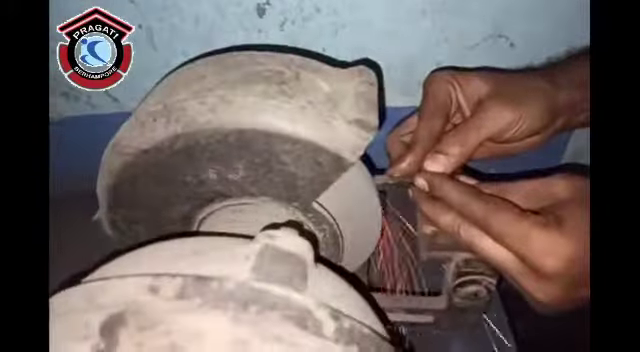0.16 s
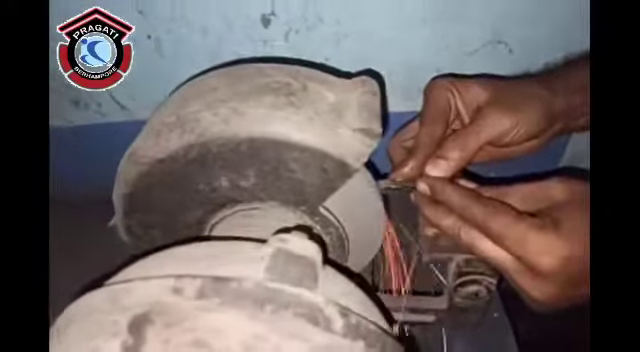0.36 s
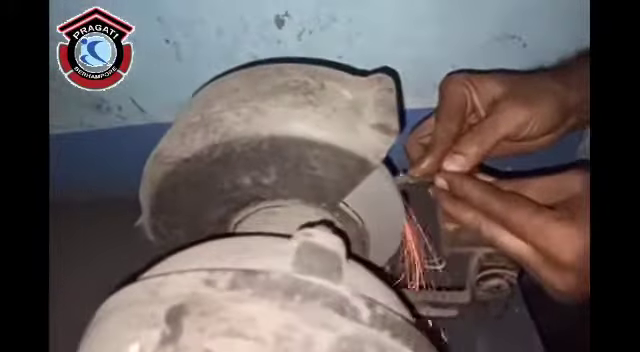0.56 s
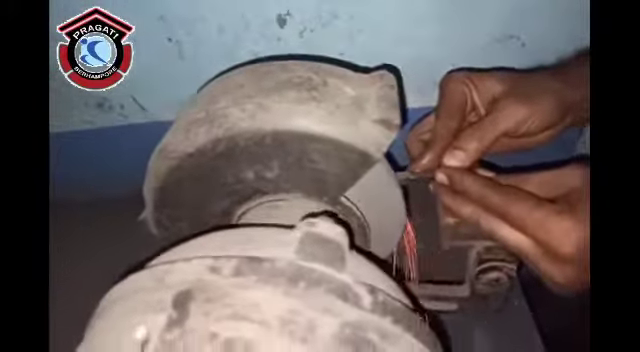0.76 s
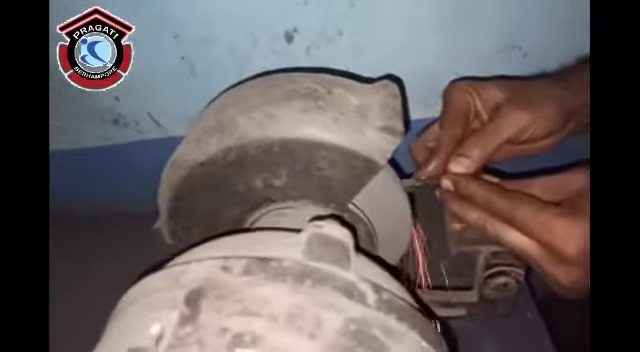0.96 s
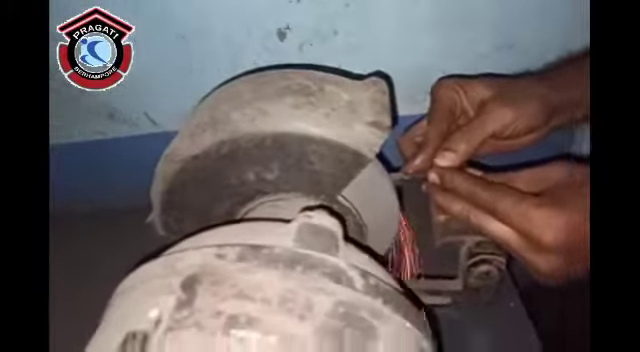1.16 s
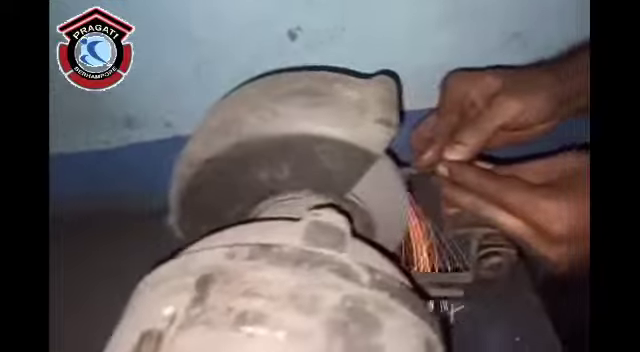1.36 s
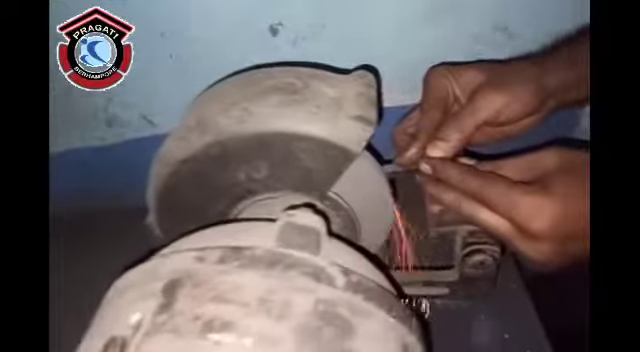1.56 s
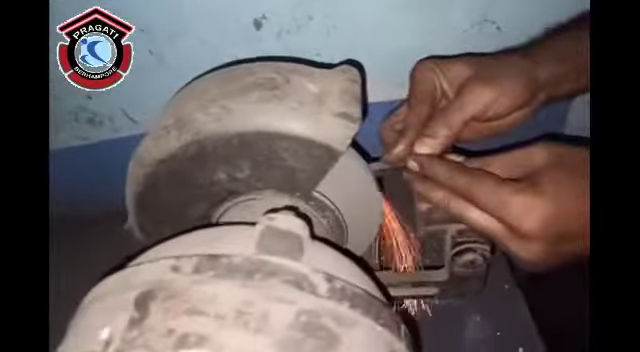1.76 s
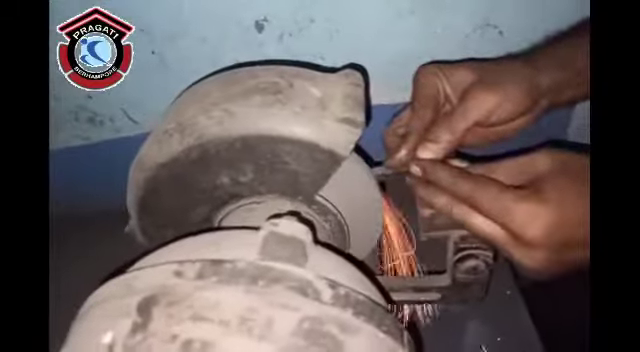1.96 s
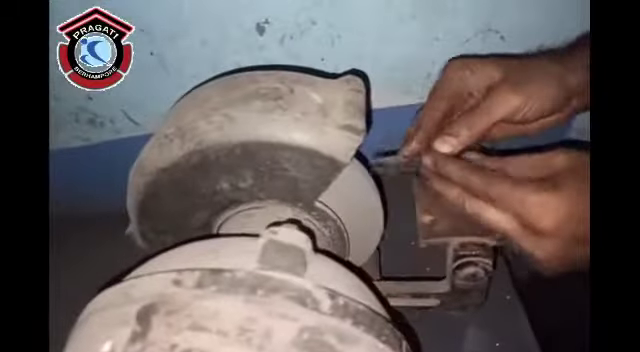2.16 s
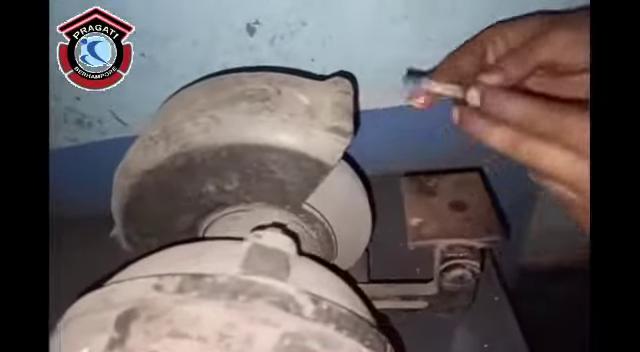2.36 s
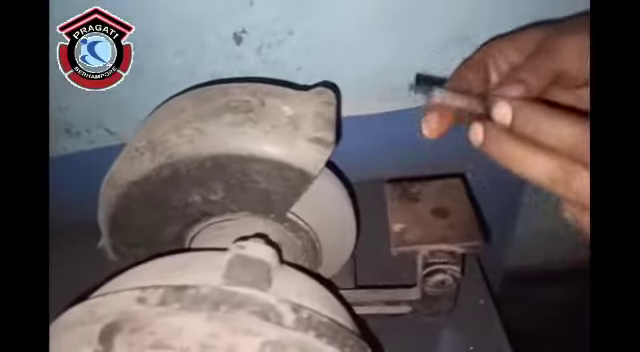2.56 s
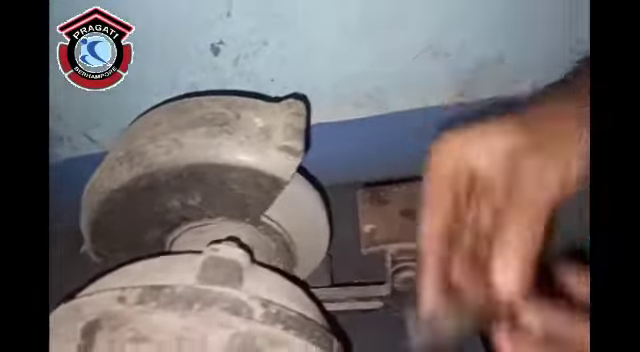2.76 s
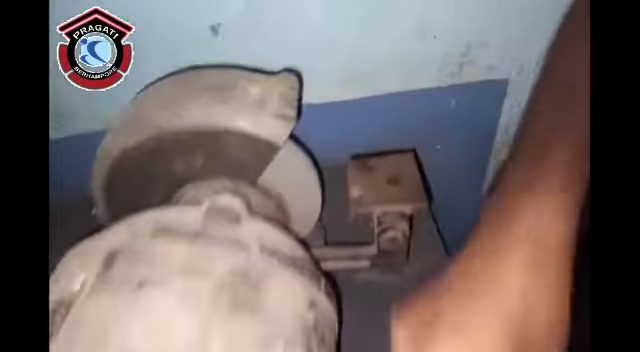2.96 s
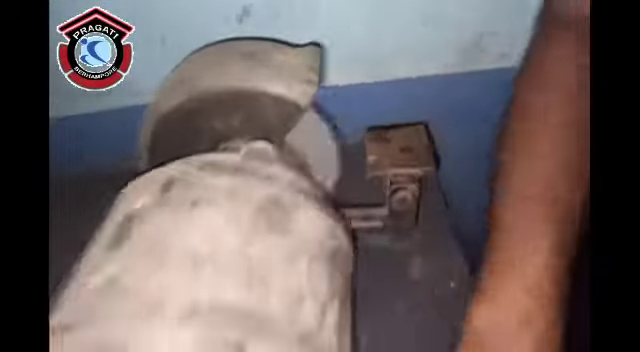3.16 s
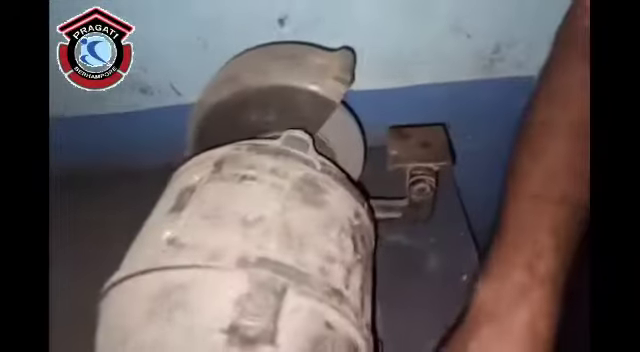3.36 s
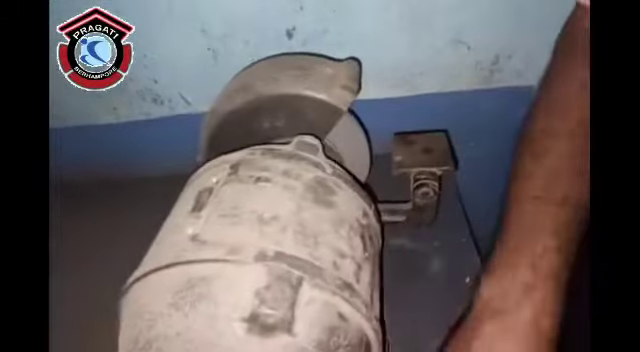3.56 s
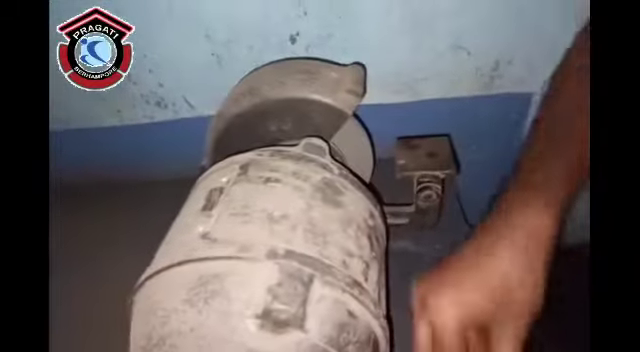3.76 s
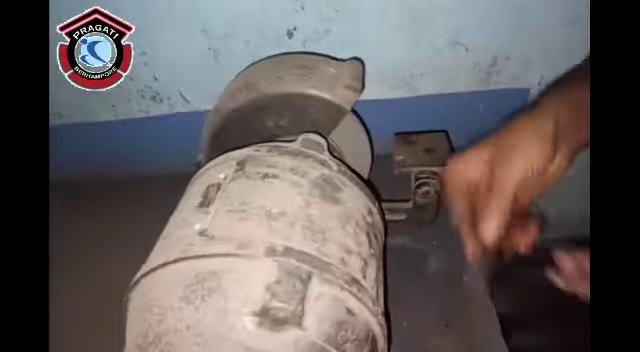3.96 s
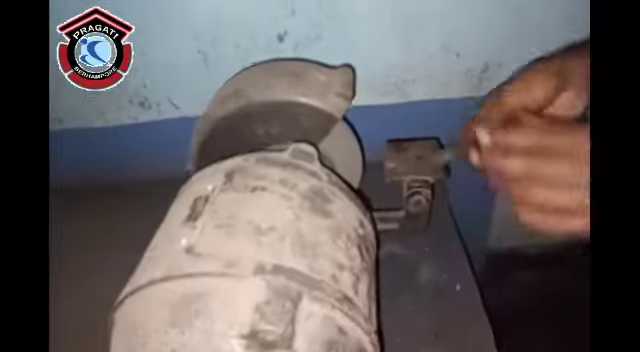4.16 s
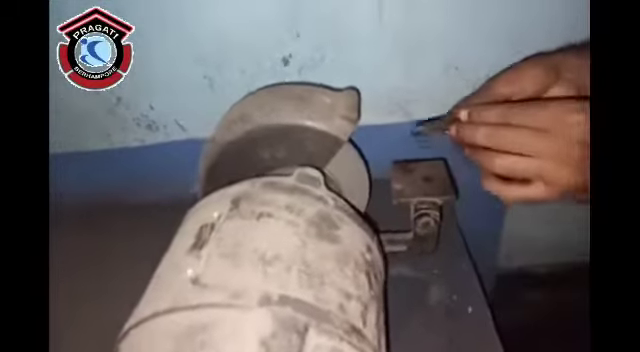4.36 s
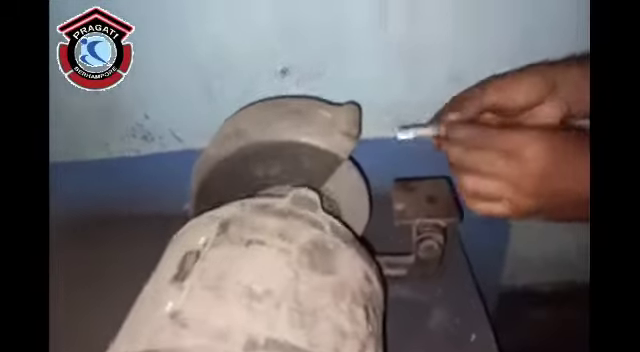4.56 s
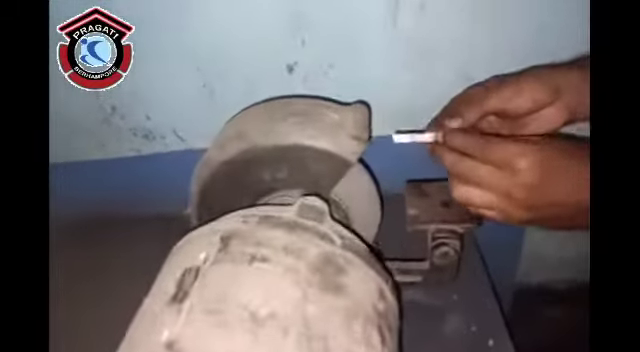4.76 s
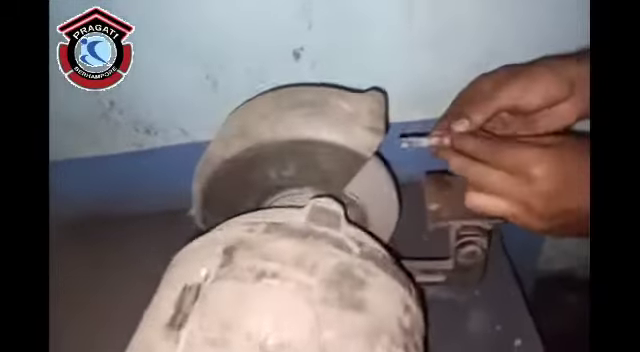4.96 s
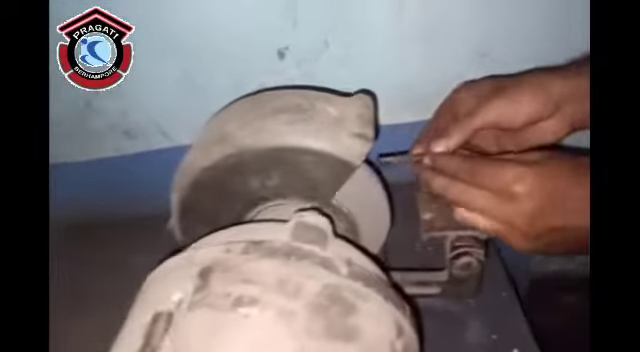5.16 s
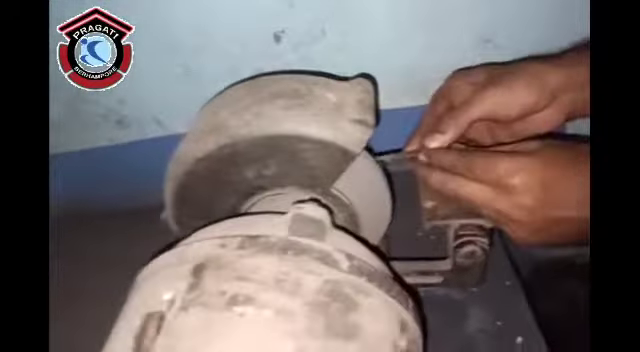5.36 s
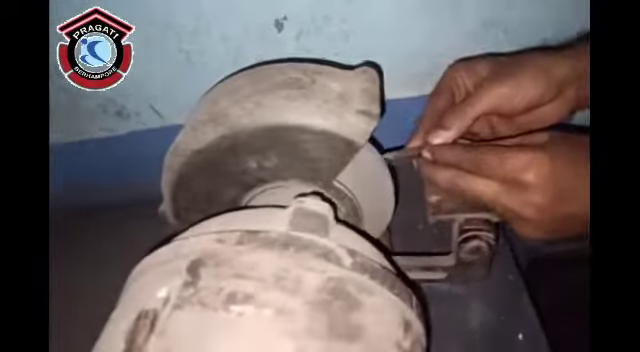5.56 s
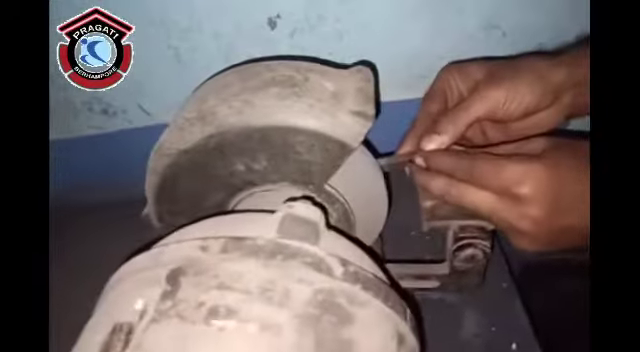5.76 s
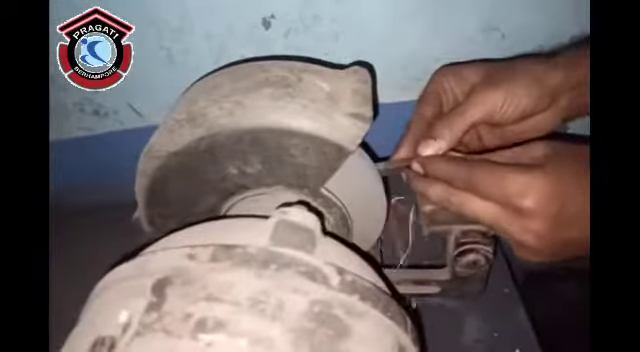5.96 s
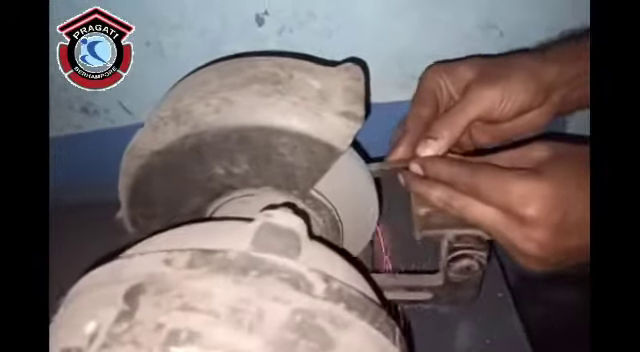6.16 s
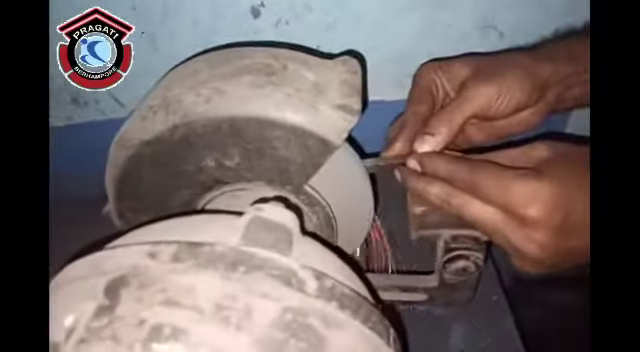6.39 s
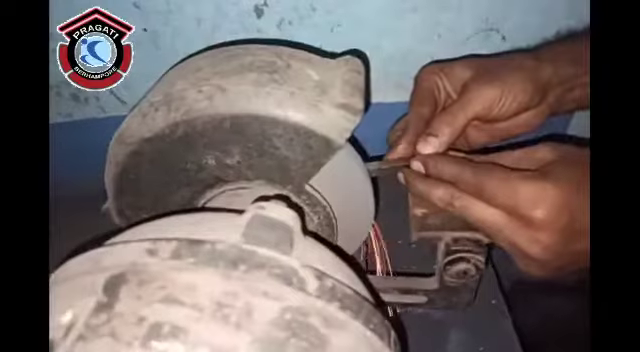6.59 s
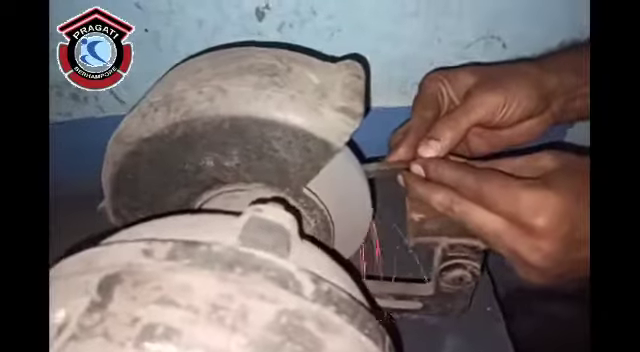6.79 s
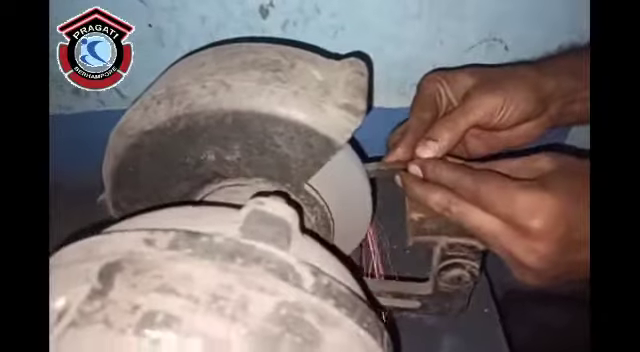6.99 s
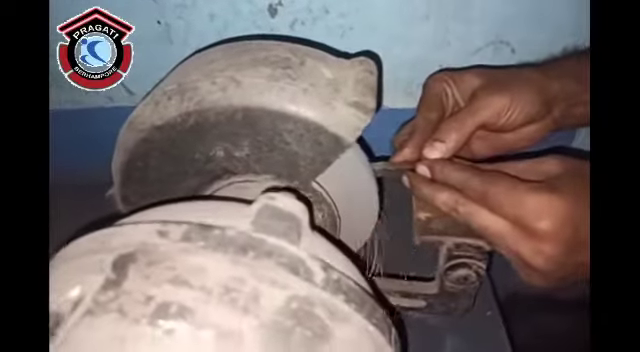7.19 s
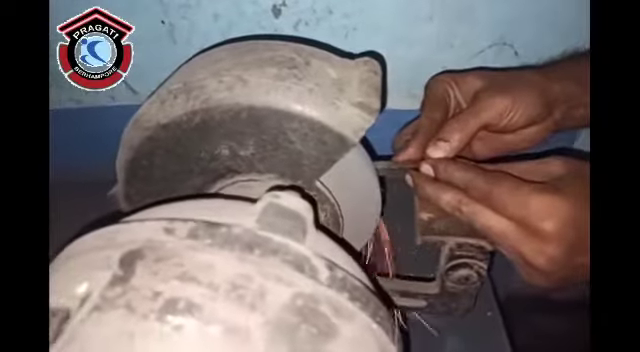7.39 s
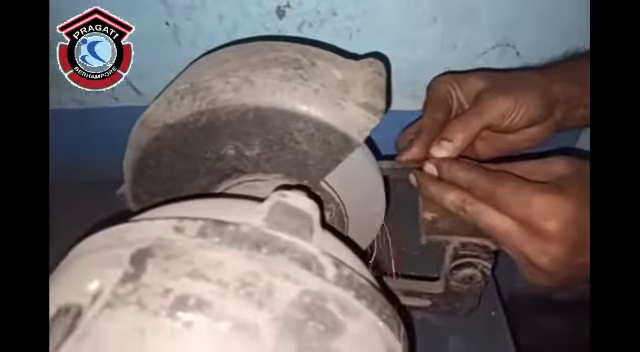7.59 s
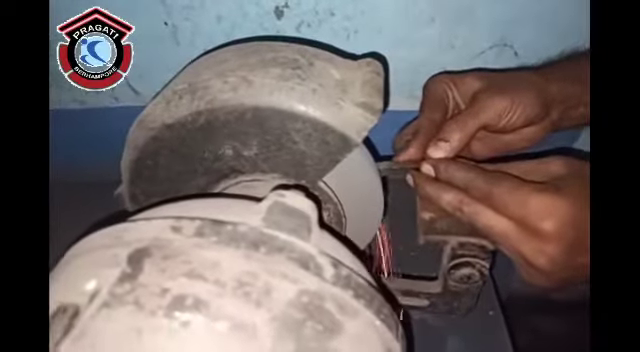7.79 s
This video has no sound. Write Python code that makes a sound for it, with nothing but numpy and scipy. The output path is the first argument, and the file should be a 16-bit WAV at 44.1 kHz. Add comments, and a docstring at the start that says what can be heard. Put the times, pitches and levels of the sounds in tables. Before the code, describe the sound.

A bench grinder runs close to the microphone in a small workshop, its motor humming low. At first a short steel bar rasps on the wheel, bright and ringing, with little squeals. The grinding stops, and for nearly four seconds the spinning machine rumbles and rattles with irregular metallic clanks. Then the rattle dies down as the steel meets the wheel again, hissing and squealing to the end.

```python
"""A bench grinder grinds a short steel bar, twice, in a small workshop. Grit makes the bar hiss,
ring and squeal; the wheel's uneven rim drones through the frame, repeating once a turn.
Between the two spells the wheel runs free and loose bearings rattle in the housing and wheel guard;
the load quiets them. The motor hums at multiples of the mains rate throughout."""
import sys
import numpy as np
from scipy import signal
from scipy.fft import rfft, irfft
from scipy.io import wavfile
from scipy.ndimage import uniform_filter1d

SR = 44100
rng = np.random.default_rng(int(sys.argv[2]) if len(sys.argv) > 2 else 0)


def to_wav(s):
    """Save 16-bit WAV."""
    ch = np.atleast_2d(s).T  # columns
    pcm = np.round(np.clip(ch, -1, 1) * 32767)  # PCM
    wavfile.write(sys.argv[1], SR, pcm.astype(np.int16))


N = 345303
TIME_S = np.arange(N) / SR
FREQ_HZ = np.maximum(np.arange(N // 2 + 1) * SR / N, 1)

# bar on the wheel: start_s, end_s
CONTACT_SPANS = [(-.3, 2.135), (5.908, 9)]
# housing and guard resonances: freq_hz, width_hz, boost_db
HOUSING_MODES = [(290.5, 22, -6.5), (318, 35, 2.5), (387.4, 24.8, 13.5), (468.3, 48, 9.5), (518, 17, -4),
                 (563.6, 25.4, 9.5), (627, 35, 4.5), (684.6, 48, 12), (737, 30, -5), (942.4, 73, 15.5),
                 (1015, 48, 11), (1083, 78, 10.5), (1193, 50, 11.5), (1296, 43, -0.5), (1739, 110, 10.5),
                 (1882, 120, 8), (2154, 146, 7), (2350, 70, 3), (2465, 100, 3.5), (2582, 30, 12.5),
                 (2660, 98, -1.5), (3216, 120, 6.5), (3550, 1130, 6.5), (4390, 130, 7.5), (4680, 120, 11),
                 (4850, 50, 9), (5670, 120, 6), (6550, 120, 1), (7590, 230, 7)]
# broad spectrum of bearing knocks: freq_hz, gain_db
KNOCK_COLOUR = [(25, -39), (50, -27), (100, -26.5), (200, -11), (300, -5), (450, 1.5), (800, -9.5),
                (1100, -11.5), (1500, -13), (2800, -20), (4000, -20), (5000, -31), (6800, -17),
                (8400, -28.5), (12000, -31.5)]
# likeness of the two ears, under load and running free: freq_hz, correlation
LOAD_CORRELATION = [(60, -0.26), (92, 0.69), (140, -0.064), (210, 0.12), (330, 0.46), (500, 0.47),
                    (770, 0.29), (1170, 0.57), (1790, 0.22), (2740, -0.065), (4190, 0.25), (6410, -0.017),
                    (9810, 0.18), (15000, -0.61)]
FREE_CORRELATION = [(60, 0.65), (99, 0.91), (160, 0.74), (270, 1), (450, 0.51), (740, 0.75), (1220, 0.56),
                    (2010, -0.017), (3330, -0.39), (5500, 0.032), (9080, 0.024), (15000, 0.076)]
# left over right, under load and running free: freq_hz, pan_db
LOAD_PAN = [(60, 3), (99, 16), (160, 7), (270, 3.5), (450, -3), (740, -6.5), (1220, -3), (2010, -2),
            (3330, -2.5), (5500, -2), (7400, -3), (8350, 6), (15000, 2.5)]
FREE_PAN = [(60, -4), (92, 10.5), (140, 4.5), (210, -2.5), (330, 0), (500, 3), (770, -1), (1170, 1.5),
            (1790, 4), (2740, 0), (4190, -4), (6410, -0.5), (9810, -0.5), (15000, 3)]
LOAD_STEREO, FREE_STEREO = (LOAD_CORRELATION, LOAD_PAN), (FREE_CORRELATION, FREE_PAN)


def grit(turns, age_s, hiss_swing, sing_swing, pitch_hz, sing_hz=4060, sing_width_hz=320):
    """Grains cut the steel and ring the bar, hardest where the wheel's high spot passes."""
    # broad spectrum of the cuts: freq_hz, gain_db
    cut_colour = [(1200, -19.5), (2800, -17.5), (3500, -7), (4500, -9), (5000, -19.5), (6500, -8),
                  (8400, 0.5), (8620, 9.5), (9000, 7.5), (12000, -6), (15500, -8)]
    # bar resonances: freq_hz, width_hz, boost_db
    bar_modes = [(3950, 50, 7), (4058, 220, 20), (4240, 110, 4), (4390, 90, 4), (4670, 110, 5),
                 (5290, 110, 5), (5820, 120, 10), (6170, 93, 5.5), (6290, 130, 5), (6830, 200, 3),
                 (7290, 130, 5), (7470, 100, 3), (7615, 75, 5), (7730, 80, -3), (7860, 110, 1),
                 (7990, 100, 1.5), (8215, 90, 6), (8330, 150, 5.5), (8465, 90, 10), (8590, 100, -7)]
    # depth of bite: time_s, gain_db
    hiss_curve = [(0, -20.5), (.7, -17.5), (2.1, -18.5), (5.95, -18), (7.83, -19)]
    # rasp, growing with hand pressure: time_s, gain_db
    rasp_curve = [(0, -3), (.4, -5), (.7, -.5), (1.3, 0.5), (1.65, -1.5), (2.1, -2), (5.92, -3), (6.2, 0),
                  (7.2, 0.5), (7.83, 0)]
    # how freely the fingers let the lowest mode sing: time_s, gain_db
    sing_curve = [(0, -26), (.2, -23), (.85, -29), (1.6, -22.5), (2.1, -24), (5.92, -33), (6.03, -22.5),
                  (6.25, -25.5), (7.83, -24.5)]
    rasp_band_hz, chatter_band_hz = (5500, 7900), (8460, 8750)
    bite_s, settle_s = 0.093, 0.14
    force = once_a_turn(turns, hiss_swing) * flutter(1.15, rate_hz=100)
    cuts = impacts(per_s=36000, spread_db=2.5, force=force)
    bar = body(cut_colour, bar_modes)
    lowest_mode = np.exp2(-(2 * (FREQ_HZ - sing_hz) / sing_width_hz) ** 4)
    hiss = wall_reflection(radiate(cuts, bar * (1 - lowest_mode), *LOAD_STEREO))
    # the bar bounces in the fingers: its two loudest modes sound in uneven spurts
    spurts = once_a_turn(turns, sing_swing) * flutter(2, rate_hz=50)
    spurts /= rms(spurts)
    high_mode = band(hiss, *chatter_band_hz)
    chatter = band(saturate(high_mode), *chatter_band_hz) * rms(high_mode.mean(axis=0)) * spurts
    rasp_change = (from_db(over_time(rasp_curve)) - 1) * band(hiss, *rasp_band_hz)
    hiss = hiss - high_mode + chatter + rasp_change
    hiss_db = over_time(hiss_curve) + 5 - 2 * np.exp(-age_s / bite_s)
    sing = saturate(radiate(cuts, bar * lowest_mode, *LOAD_STEREO))
    sing = irfft(rfft(sing * spurts) * lowest_mode, N)
    # the pitch lands sharp, settles and wavers with the grip
    bend_hz = pitch_hz - sing_hz + 70.56 * np.exp(-age_s / settle_s) + 8 * drift(12)
    sing = np.real(signal.hilbert(sing) * np.exp(2j * np.pi * np.cumsum(bend_hz) / SR))
    return from_db(hiss_db) * hiss + from_db(over_time(sing_curve) - 0.25) * sing


def frame(gain_db):
    """The cutting force shakes the wheel, and with it the housing."""
    # broad spectrum of the shaking: freq_hz, gain_db
    shake_colour = [(25, -29), (40, -35), (75, -8), (110, -3.5), (200, 0), (300, -1), (450, 4), (700, -2.5),
                    (850, -5.5), (1100, -3), (1400, 0.5), (1700, -6.5), (2200, -8.5), (2900, -8.5)]
    shakes = impacts(per_s=8000, spread_db=1, force=flutter(1.5, rate_hz=60))
    housing = body(shake_colour, HOUSING_MODES) * lowpass(3000, order=7)
    return from_db(gain_db - 1.5) * radiate(shakes, housing, *LOAD_STEREO)


def rim_drone(turns, level_db, waver_db=2.5):
    """The same bumps of the rim come round every turn and drone at multiples of the turning rate."""
    # rim harmonics: multiple, relative_db
    harmonics = [(6, -17), (7, -21), (8, -12), (9, -9), (11, -15), (13, -7), (14, -7.5), (15, -20.5),
                 (16, -16), (19, -18), (20, -16), (21, -4.5), (22, -1), (26, -17), (28, -10.5), (29, -12.5),
                 (40, -16.5), (47, -23), (48, -20), (53, -29)]
    drone = sum(from_db(db + waver_db * drift(5)) * np.sin(2 * np.pi * (k * turns + rng.random()))
                for k, db in harmonics)
    return pan(-4) * from_db(level_db) * drone / rms(drone)


def bedding_in(turns, swing, age_s, grow_s=0.13):
    """The ring of bar and frame grows and changes colour as the steel beds in on the wheel."""
    # modes of the widening ground face: freq_hz, width_hz, base_db, slope_db_per_s
    modes = [(6330, 200, -44.5, 4.5), (13140, 350, -29.5, -1.5), (1096, 120, -43.5, 3)]
    cuts, _ = impacts(per_s=22000, spread_db=4, force=once_a_turn(turns, swing))
    bedded = 1 - np.exp(-age_s / grow_s)
    ringing = sum(from_db(db + slope * age_s) * mode(cuts, hz, width) for hz, width, db, slope in modes)
    return pan(-5) * bedded * ringing


def grip_rings(turns, swing):
    """Each shift of the fingers frees other modes of bar and frame, which swell and fade."""
    # freed modes: peak_s, spread_s, freq_hz, width_hz, level_db
    modes = [(.15, 0.56, 7500, 200, -27.5), (.2, 0.33, 6830, 77, -34.5), (.9, .4, 3953, 26, -32),
             (1.05, 0.28, 8215, 70, -29), (1.15, 0.28, 13200, 260, -24.5), (1.35, 0.61, 4125, 11, -30.5),
             (1.75, 0.21, 7260, 70, -30), (1.8, .35, 5840, 140, -33.5), (1.8, 0.21, 13500, 410, -34),
             (6.04, 0.063, 1090, 67, -26.5), (6.4, 0.39, 552, 28, -35), (6.8, 0.52, 8060, 43, -40),
             (6.8, 0.063, 1060, 50, -26), (7, 0.033, 1052, 18, -25), (7, 0.55, 13300, 500, -30),
             (7.25, 0.034, 1060, 44, -31.5), (7.4, 0.75, 6120, 100, -40), (7.5, 0.32, 1130, 30, -35)]
    cuts, _ = impacts(per_s=24000, spread_db=2, force=once_a_turn(turns, swing))
    return pan(-3) * sum(swells([(peak_s, db)], spread_s) * mode(cuts, hz, width)
                         for peak_s, spread_s, hz, width, db in modes)


def squeals(turns, swing, jitter_hz=28):
    """The wheel briefly locks on to the bar's lowest mode: a gliding tone that throbs once a turn."""
    # catches: peak_s, spread_s, pitch_hz, glide_hz_per_s, level_db
    catches = [(.14, 0.027, 4050, 200, -19.5), (.25, 0.032, 4070, 0, -23), (.48, .05, 3980, 0, -21),
               (1.28, .025, 3955, 0, -24), (1.39, 0.017, 4070, 0, -23), (1.53, 0.082, 4064, 2, -22),
               (1.9, 0.088, 4060, 0, -25), (6.05, 0.054, 4110, -450, -23), (6.37, 0.059, 4040, -400, -26),
               (6.58, 0.052, 4080, 1000, -23.5), (6.75, .03, 4110, 300, -25),
               (6.91, .045, 4048, -200, -23.5), (7.25, 0.065, 4076, 0, -25.5),
               (7.38, .025, 4045, -900, -25), (7.63, .03, 3985, 602, -24)]
    jitter_cycles = np.cumsum(jitter_hz * drift(70)) / SR
    throb = once_a_turn(turns, swing) * flutter(2, rate_hz=50)
    tones = np.zeros(N)
    for peak_s, spread_s, hz, glide, db in catches:
        near = np.abs(TIME_S - peak_s) < 4 * spread_s
        t = TIME_S[near] - peak_s
        cycles = hz * t + 0.5 * glide * t ** 2 + jitter_cycles[near]
        tones[near] += from_db(db) * np.exp(-0.5 * (t / spread_s) ** 2) * np.sin(2 * np.pi * cycles)
    return pan(-2) * throb * tones


def shudders():
    """The bar digs in and the bench gives a short, deep shake."""
    # digs: peak_s, level_db
    digs = [(.04, -50), (.22, -44), (2.07, -42), (6.33, -40), (7.15, -43), (7.27, -43)]
    shakes, _ = impacts(per_s=3000, spread_db=1)
    return pan(8) * swells(digs, spread_s=0.033) * saturate(mode(shakes, freq_hz=90.5, width_hz=20))


def bearings(play, reference_m=0.3, rumble_db=-21, rattle_db=-32.5):
    """Loose balls knock in the housing: soft knocks rumble; hard ones need more play and ring higher."""
    # listener to wheel guard: time_s, distance_m
    distance_curve = [(2.2, 0.25), (2.65, 0.24), (2.97, 0.24), (3.2, 0.27), (3.6, 0.29), (4.1, 0.3),
                      (4.68, 0.3), (4.9, 0.28), (5.25, 0.27), (5.85, 0.25)]
    # the shaft wobbles harder: peak_s, added_amplitude_db
    surges = [(2.2, -24), (2.62, -8), (2.76, -9), (2.94, -12), (3.07, -12), (3.31, -14), (3.9, -11),
              (4.87, -9), (5.11, -7), (5.26, -9), (5.66, -14), (5.75, -11), (5.85, -9)]
    nearness = reference_m / over_time(distance_curve)
    force = flutter(1, rate_hz=14) * flutter(0.5, rate_hz=70)
    knocks = impacts(per_s=11000, spread_db=0, force=force)
    housing, soft = body(KNOCK_COLOUR, HOUSING_MODES), lowpass(1450, order=6)
    rumble = even_out(radiate(knocks, housing * soft, *FREE_STEREO), span_s=0.068)
    rumble *= from_db(rumble_db) * nearness * (1 + swells(surges, spread_s=0.02, rise_ratio=0.8))
    rattle = radiate(knocks, housing * np.sqrt(1 - soft ** 2), *FREE_STEREO)
    rattle *= from_db(rattle_db) * nearness ** 0.75
    return play * rumble + play ** 2 * (rattle + guard_rings(force, nearness))


def guard_rings(force, nearness):
    """Knocks keep modes of the guard ringing; some stand out close by, others further off."""
    # guard modes: freq_hz, width_hz, level_db, nearness_exponent
    modes = [(447.6, 14.6, -33.5, 6), (562, 12, -36, -4.5), (1015, 18, -35, -6.5), (1757, 52, -34.5, 0),
             (2380, 65, -44.5, -13), (2600, 38, -53, -2.5), (2660, 24, -54.5, 1), (3180, 280, -49, 0.5),
             (3490, 105, -44, 4.5), (3740, 170, -49, 0.5)]
    knocks, _ = impacts(per_s=3000, spread_db=-0.8, force=force * flutter(1.8, rate_hz=40))
    return pan(3.5) * sum(from_db(db) * nearness ** power * even_out(mode(knocks, hz, width), span_s=0.09)
                          for hz, width, db, power in modes)


def clatter(gain_db=-13.5):
    """Fits of rattling shake the guard; the hardest reach far into the treble."""
    # fits: peak_s, relative_db, clank_extra_db
    fits = [(2.2744, -11, -0.5), (2.44, -9, -0.5), (2.5164, -16.5, 1), (2.585, -20, 3), (2.622, -12.5, 1),
            (2.69, -16, -2), (2.735, -11, -3), (2.784, -11.5, -1.5), (3.033, -9.5, -10), (3.1428, -12, -8),
            (3.213, -18.5, 8), (3.2974, -13, -1.5), (3.4244, -14.5, -2), (3.546, -12.5, 0), (3.66, -15, -9),
            (3.895, -15, -1), (4.1374, -17, -1), (4.34, -14, -4), (4.406, -10, -4.5), (4.65, -19, 5),
            (4.772, -13.5, -11), (4.835, -9, -9), (4.8744, -11, -3), (4.9356, -9, -6), (4.9914, -17, -1),
            (5.1, -13, -3.5), (5.177, -13.5, 3.5), (5.1964, -16, 2), (5.2163, -16, 4), (5.255, -10.5, -10),
            (5.337, -9.5, -6), (5.357, -12.5, -4), (5.596, -12.5, 2), (5.693, -11, -1.5)]
    # struck modes: freq_hz, width_hz, relative_db
    clang_modes = [(1670, 100, -8), (1900, 60, -14.5), (2150, 77, -17.5), (2586, 44, -17.5),
                   (3140, 78, -16), (3460, 82, -15.5), (4380, 110, -20), (4640, 110, -22)]
    spread_s = 0.012
    fit_envelope = swells([(s, db) for s, db, _ in fits], spread_s)
    clank_envelope = swells([(s, db + extra_db) for s, db, extra_db in fits], spread_s)
    blows = impacts(per_s=6200, spread_db=4.5)
    guard = body(KNOCK_COLOUR, [(hz, width, 1.54 * db) for hz, width, db in HOUSING_MODES])
    soft, dull = lowpass(1450, order=6), lowpass(5000, order=3)
    hard = np.sqrt(1 - soft ** 2)
    thump = radiate(blows, guard * soft, *FREE_STEREO)
    clank = from_db(-2.5) * radiate(blows, guard * hard * dull, *FREE_STEREO)
    crash = from_db(-1) * radiate(blows, guard * hard * (1 - dull) * lowpass(8500, order=4), *FREE_STEREO)
    clang = sum(from_db(db) * flutter(3, rate_hz=8.8) * mode(blows[1], hz, width)
                for hz, width, db in clang_modes)
    hard_hits = clank_envelope * clank + clank_envelope ** 2 * crash
    return from_db(gain_db) * (fit_envelope * (thump + clang) + hard_hits)


def guard_whine():
    """Rough bursts of knocks keep one mode of the guard whining for a moment."""
    # whine envelope: time_s, level_db
    level_curve = [(3.16, -70), (3.22, -34), (3.31, -31.5), (3.4, -40), (3.55, -44), (3.75, -59),
                   (4.2, -64)]
    knocks, _ = impacts(per_s=3000, spread_db=0.3, force=flutter(4, rate_hz=25))
    ringing = mode(knocks, freq_hz=2586, width_hz=47)
    return from_db(over_time(level_curve)) * even_out(ringing, span_s=0.063)


def scuffs():
    """Short, bright rubs of steel as the bar is handled."""
    # rubs: peak_s, level_db
    rubs = [(3.178, -31), (3.212, -30)]
    # rub spectrum: freq_hz, gain_db
    rub_colour = [(500, -20), (2200, -15), (5000, -5), (8000, 3), (15000, 1)]
    friction = radiate(impacts(per_s=11000, spread_db=6), from_db(over_freq(rub_colour)), *FREE_STEREO)
    return swells(rubs, spread_s=0.015, rise_ratio=0.46) * friction


def motor_hum(mains_hz=50.13):
    """The motor iron hums at multiples of the mains rate."""
    # magnetic harmonics: multiple, level_db, pan_db
    harmonics = [(1, -70, 10), (2, -52, 2.5), (3, -49.5, -7), (4, -48.5, 3.5), (6, -48.5, 5)]
    # hum strength: time_s, gain_db
    gain_curve = [(0, 3), (2.1, -3.5), (2.3, 8), (4.2, 7), (5.7, -3), (7.83, -5)]
    hum = sum(pan(pan_db) * from_db(db) * np.sin(2 * np.pi * (k * mains_hz * TIME_S + rng.random()))
              for k, db, pan_db in harmonics)
    return hum * from_db(over_time(gain_curve))


def handling(seat_s=0.0054, lift_s=0.041, ease_s=0.062, calm_s=0.033, loaded_play=0.089):
    """Contact of bar and wheel, and the play that the load leaves the shaft; both about 0-1."""
    contact, load = 0, 0
    for start_s, end_s in CONTACT_SPANS:
        # the high spot grazes the bar twice before it seats
        grazes = swells([(start_s - k * 0.018, 0) for k in (1, 2)], spread_s=0.0049, rise_ratio=0.88)
        contact += 0.68 * grazes + ramp(start_s - seat_s, seat_s) - ramp(end_s, lift_s)
        # the shaft loosens as the hand eases off; the last of its play builds after the lift
        freed = ramp(end_s - 0.65 * ease_s, ease_s) * (1 - 0.12 * decay(end_s, tau_s=0.052))
        load += (1 - decay(start_s, calm_s)) * (1 - freed)
    return contact, np.clip(1 - (1 - loaded_play) * load, 0, 1)


def impacts(per_s, spread_db, force=1):
    """Spectra of two dense trains of tiny, uneven blows under a common force."""
    struck = rng.random((2, N)) < per_s / SR
    sizes = rng.standard_normal((2, N)) * from_db(spread_db * np.clip(rng.standard_normal((2, N)), -2, 2))
    return rfft(struck * sizes * force)


def body(colour, resonances):
    """Gain of a broad colour with resonance peaks on it."""
    peaks_db = sum(db * np.exp2(-(2 * (FREQ_HZ - hz) / width) ** 2) for hz, width, db in resonances)
    return from_db(over_freq(colour) + peaks_db)


def mode(blows, freq_hz, width_hz):
    """A spectrum of blows through one resonance; rms 1."""
    ringing = irfft(blows / (1 + (2 * (FREQ_HZ - freq_hz) / width_hz) ** 2), N)
    return ringing / rms(ringing)


def radiate(blows, gain, correlation, pan_curve, reflection_s=0.0019, ripple=0.45):
    """Blows through a body to two ears, with near reflections and diffuse sound; mid rms 1."""
    alike = np.clip(over_freq(correlation), -0.99, 0.99)
    reflections = rfft(rng.standard_normal(2048) * np.exp(-TIME_S[:2048] / reflection_s), N)
    # in the treble the ears differ mostly in phase; reflections ripple each ear's spectrum
    near_share = 0.95 * (1 - lowpass(1700, order=2) ** 2)
    shift = 1j + ripple * reflections.real / np.abs(reflections)
    side = np.sqrt(near_share) * blows[0] * shift / np.abs(shift) + np.sqrt(1 - near_share) * blows[1]
    ears = np.sqrt(1 + alike) * blows[0] + np.sqrt(1 - alike) * side * np.array([[1], [-1]])
    stereo = irfft(ears * gain * pan(over_freq(pan_curve)), N)
    return stereo / rms(stereo.mean(axis=0))


def wall_reflection(x, echo_db=-14, delay_s=0.00148):
    """One close reflection off the wall behind the wheel combs the sound."""
    return x + from_db(echo_db) * np.array([np.interp(TIME_S - delay_s, TIME_S, ear) for ear in x])


def saturate(ringing):
    """A friction-driven ring saturates, so its strength steadies; mid rms 1."""
    analytic = signal.hilbert(np.atleast_2d(ringing))
    tone = analytic.real / np.sqrt(np.mean(np.abs(analytic) ** 2, axis=0) + 0.5 * rms(ringing) ** 2)
    return tone / rms(tone.mean(axis=0))


def even_out(x, span_s):
    """Knocks feed in steady power, so slow chance swells level out; rms about 1."""
    size = int(span_s * SR)
    power = np.atleast_2d(x).mean(axis=0) ** 2
    smoothed = uniform_filter1d(uniform_filter1d(power, size), size)
    return x / np.sqrt(np.maximum(smoothed, 1e-12))


def once_a_turn(turns, swing):
    """Gain that peaks as the wheel's high spot passes."""
    return 1 + swing * np.cos(2 * np.pi * turns)


def drift(rate_hz):
    """Smooth noise up to about rate_hz; rms 1."""
    count = int(2 * rate_hz * N / SR) + 2
    slow = signal.resample(rng.standard_normal(count), count * 10)
    return np.interp(np.linspace(0, len(slow) - 1, N), np.arange(len(slow)), slow / rms(slow))


def flutter(spread_db, rate_hz):
    """Randomly wavering gain."""
    return from_db(spread_db * drift(rate_hz))


def swells(peaks, spread_s, rise_ratio=1):
    """Bell-shaped bursts at (peak_s, level_db); rise_ratio is rise time over fall time."""
    envelope = 0
    for peak_s, db in peaks:
        away = np.maximum((peak_s - TIME_S) / rise_ratio, TIME_S - peak_s) / spread_s
        envelope += from_db(db) * np.exp(-0.5 * np.minimum(away, 10) ** 2)
    return envelope


def ramp(start_s, length_s):
    """Linear rise from 0 to 1."""
    return np.clip((TIME_S - start_s) / length_s, 0, 1)


def decay(start_s, tau_s):
    """1 until start_s, then an exponential fall."""
    return np.exp(-np.maximum(TIME_S - start_s, 0) / tau_s)


def over_time(points):
    """A curve at every sample."""
    return np.interp(TIME_S, *np.transpose(points))


def over_freq(points):
    """A curve at every frequency, on a log axis."""
    hz, value = np.transpose(points)
    return np.interp(np.log(FREQ_HZ), np.log(hz), value)


def lowpass(cutoff_hz, order):
    """Gain of a smooth low-pass."""
    return 1 / np.sqrt(1 + (FREQ_HZ / cutoff_hz) ** (2 * order))


def band(x, low_hz, high_hz):
    """Steep band-pass."""
    return irfft(rfft(x) * lowpass(high_hz, order=80) * (1 - lowpass(low_hz, order=80)), N)


def pan(db):
    """Stereo gains, left over right by db."""
    return from_db(np.array([[0.5], [-0.5]]) * db)


def from_db(db):
    """Decibels to gain."""
    return 10 ** (np.asarray(db) / 20)


def rms(x):
    """Root mean square."""
    return np.sqrt(np.mean(x ** 2) + 1e-20)


def scene(free_turn_hz=49.8, wander_hz=0.046):
    """The running grinder, with the bar on, off and on the wheel."""
    # grinding spells: slowing_hz, hiss_swing, sing_swing, frame_db, creep_db_per_s, drone_db, pitch_hz
    spells = [(.38, 0.19, 0.3, -25, 0.66, -28, 4045), (0.1432, 0.04, 0.08, -21.5, -1.37, -29.5, 4072)]
    spell = (TIME_S > (CONTACT_SPANS[0][1] + CONTACT_SPANS[1][0]) / 2).astype(int)
    age_s = np.maximum(TIME_S - np.array(CONTACT_SPANS)[spell, 0], 0)
    settings = np.array(spells)[spell].T
    slowing_hz, hiss_swing, sing_swing, frame_db, creep_db_per_s, drone_db, pitch_hz = settings
    contact, play = handling()
    turns = np.cumsum(free_turn_hz - slowing_hz * contact + wander_hz * drift(3.3)) / SR
    grinding = grit(turns, age_s, hiss_swing, sing_swing, pitch_hz)
    grinding += frame(frame_db + creep_db_per_s * age_s) + rim_drone(turns, drone_db)
    grinding += bedding_in(turns, hiss_swing, age_s) + grip_rings(turns, hiss_swing)
    grinding += squeals(turns, sing_swing) + shudders()
    return contact * grinding + bearings(play) + guard_whine() + clatter() + motor_hum() + scuffs()


def record(dry, ceiling=0.78, low_cut_hz=40, high_cut_hz=15400):
    """Rounds the highest peaks, cuts the deep bass, dulls the top octave and cuts it off steeply."""
    # dull treble with a deep notch: freq_hz, gain_db
    treble_curve = [(8480, 1), (8700, -12), (9200, -26), (10000, -74), (10500, -55.5), (11350, -75.5),
                    (11650, -5), (13500, -7), (15000, -6.5)]
    rounded = dry / (1 + (dry / ceiling) ** 8) ** (1 / 8)
    low_cut = np.sqrt(1 - lowpass(low_cut_hz, order=3) ** 2)
    treble = from_db(over_freq(treble_curve)) * lowpass(high_cut_hz, order=120)
    return irfft(rfft(rounded) * low_cut * treble, N)


dry = scene()
out = record(dry)
to_wav(out)
```